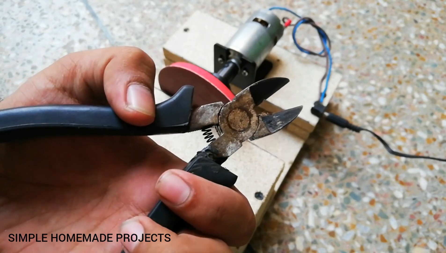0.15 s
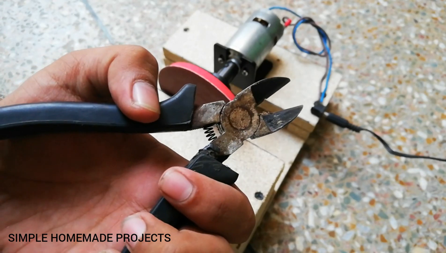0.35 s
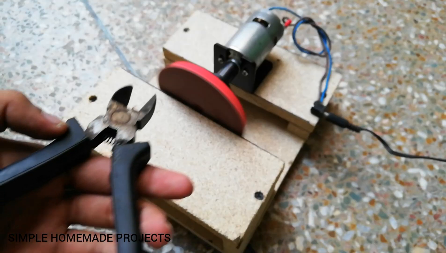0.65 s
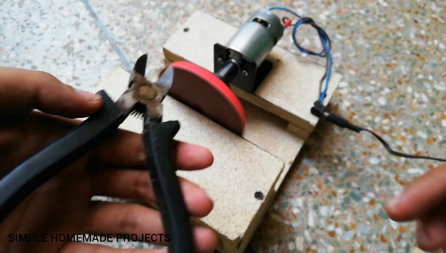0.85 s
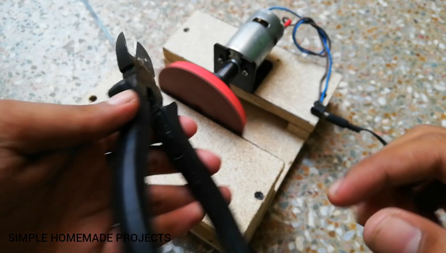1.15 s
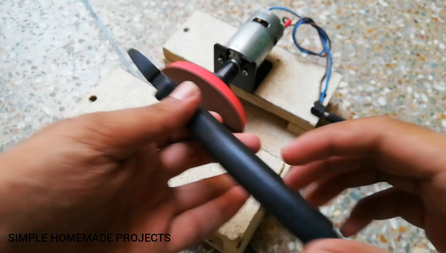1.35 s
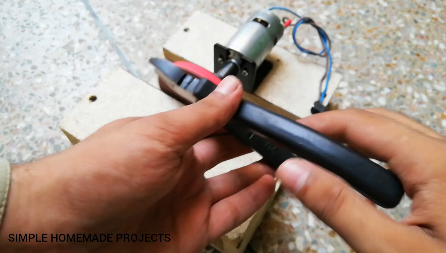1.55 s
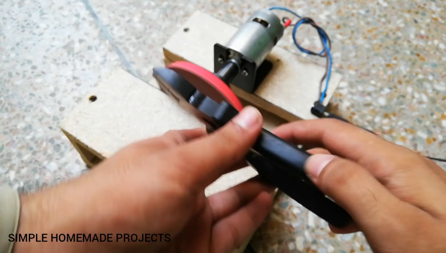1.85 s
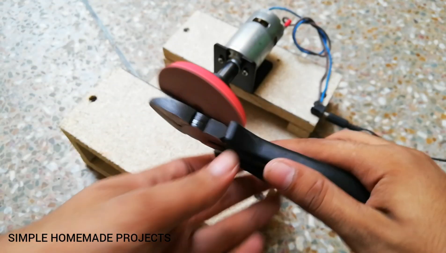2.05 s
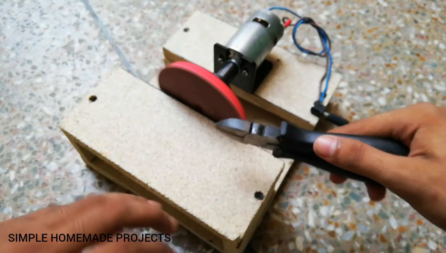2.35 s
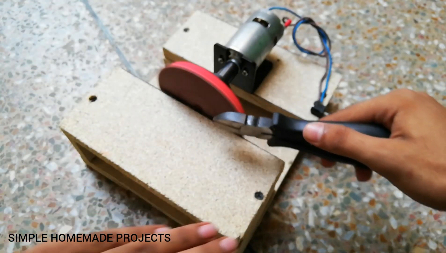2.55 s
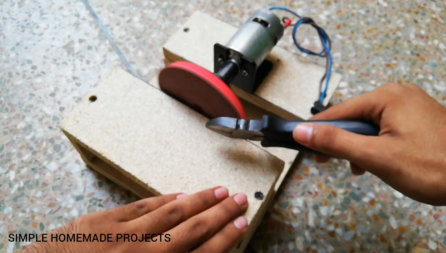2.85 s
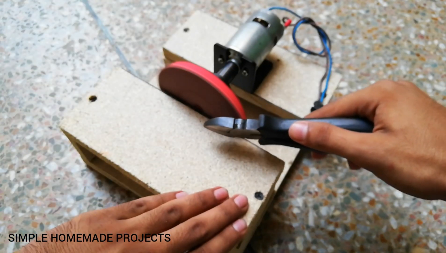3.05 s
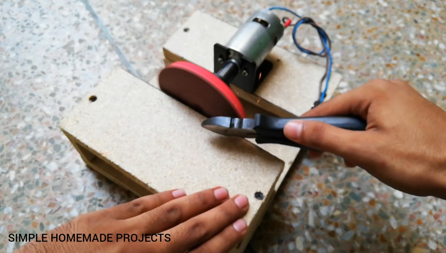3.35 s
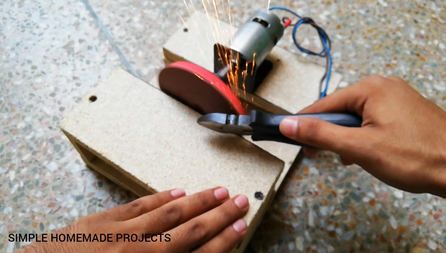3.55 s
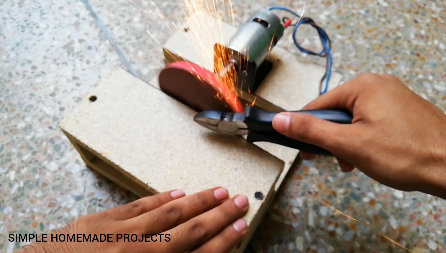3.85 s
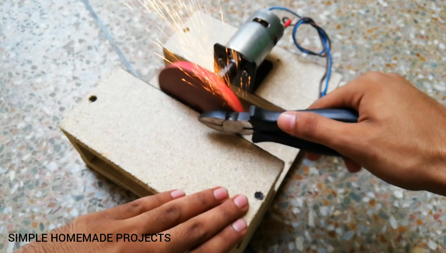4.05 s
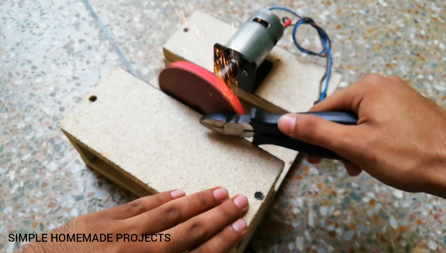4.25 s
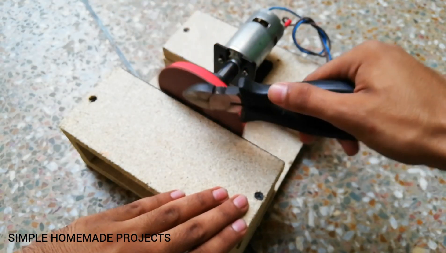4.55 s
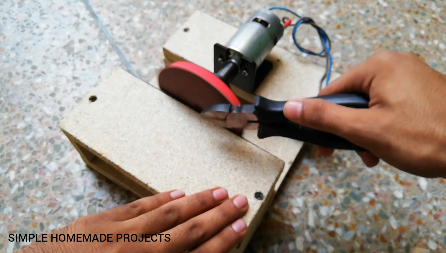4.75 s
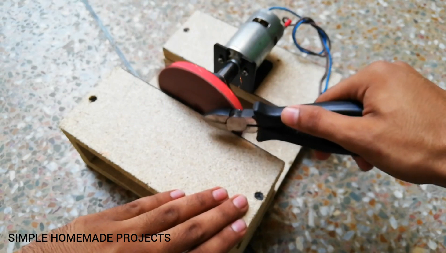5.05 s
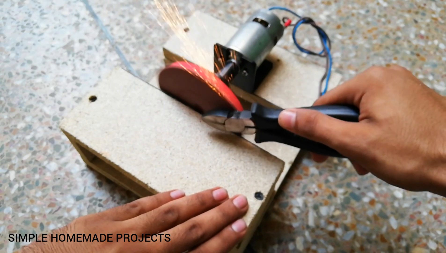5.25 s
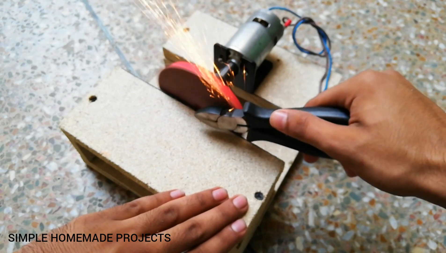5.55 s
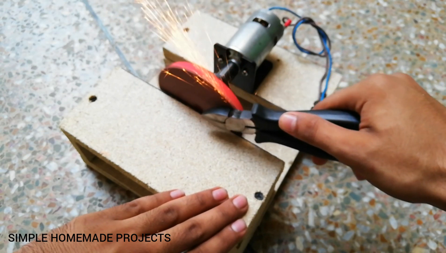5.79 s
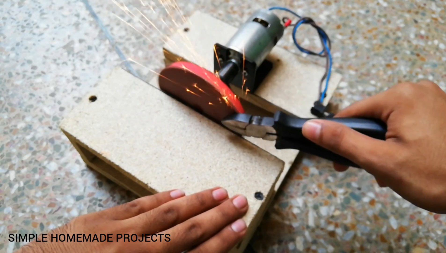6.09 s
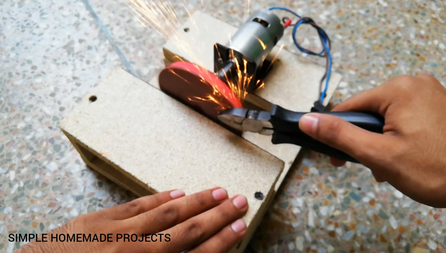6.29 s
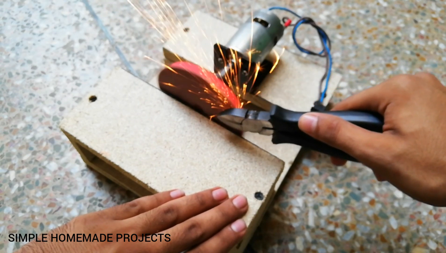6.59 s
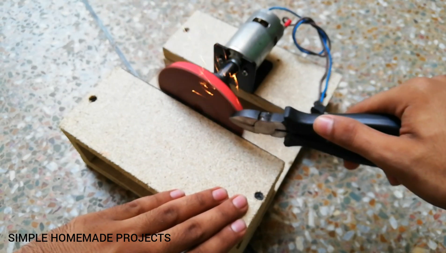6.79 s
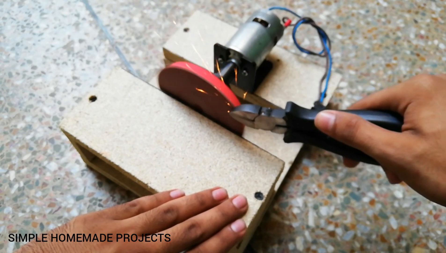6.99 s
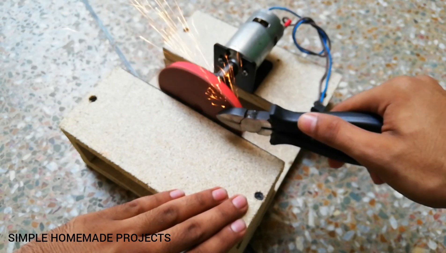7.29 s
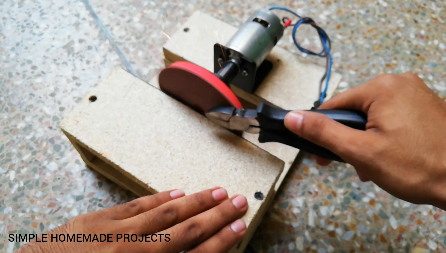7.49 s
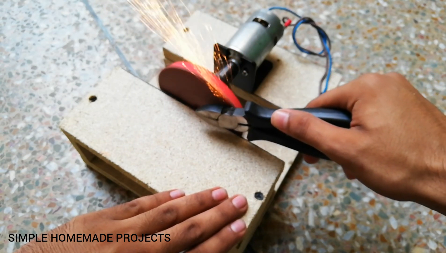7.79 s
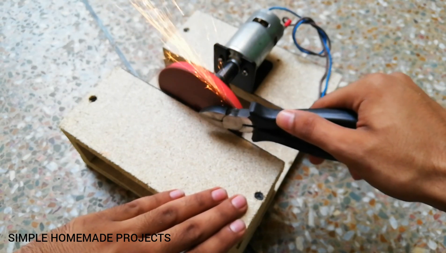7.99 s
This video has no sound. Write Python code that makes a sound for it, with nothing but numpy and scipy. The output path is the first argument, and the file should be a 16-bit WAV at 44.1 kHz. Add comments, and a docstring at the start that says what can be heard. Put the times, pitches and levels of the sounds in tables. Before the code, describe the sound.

Close up, a buzzing little disc sander runs free, then steel jaws press on, hissing and squealing shrilly while the motor pitch drops and knocks.

```python
"""A small DC motor spins a sanding disc on a wooden base on a stone floor, close to the microphones.
Shaft overtones drive the base's resonances; it rocks until a hand steadies it, while brushes hiss.
Steel pliers meet the disc: repeating grit scrapes them each turn, they ring near 10 kHz, the motor sags.
Twice the edge snags and drags the speed down, with decaying knocks. A room tail and faint rumble surround it."""
import sys
import numpy as np
from scipy import signal
from scipy.fft import rfft, irfft
from scipy.io import wavfile
from scipy.ndimage import uniform_filter1d, map_coordinates

SR = 44100
rng = np.random.default_rng(int(sys.argv[2]) if len(sys.argv) > 2 else 0)


def store_wav(level_fs):
    """Save 16-bit WAV to argv[1]."""
    pcm = np.round(np.clip(np.atleast_2d(level_fs), -1, 1) * 32767)
    wavfile.write(sys.argv[1], SR, pcm.T.astype(np.int16))


N = 358533
TIME = np.arange(N) / SR
FREQ = np.fft.rfftfreq(2 * N, 1 / SR) + 1e-3  # Hz, kept off zero
FREE_HZ = 160  # turns per second at which the free motor's levels are set


def undb(db):
    """Decibels to gain."""
    return 10 ** (np.asarray(db) / 20)


def curves(table):
    """Each column of a table, joined by straight lines in time."""
    seconds, *columns = np.transpose(table)
    return [np.interp(TIME, seconds, column) for column in columns]


def filtered(x, response):
    """Sound through a frequency response."""
    return irfft(rfft(x, 2 * N) * response)[..., :N]


def colour(points):
    """Response through (Hz, dB) points, joined on a logarithmic pitch axis."""
    hz, db = np.transpose(points)
    return undb(np.interp(np.log(FREQ), np.log(hz), db))


def band(lo_hz, hi_hz):
    """Steep band-pass response."""
    return 1 / np.sqrt((1 + (lo_hz / FREQ) ** 20) * (1 + (FREQ / hi_hz) ** 20))


def strength(x, response, size=3000):
    """Running rms of one band of a sound, shared by its channels."""
    power = np.atleast_2d(filtered(x, response) ** 2).mean(axis=0)
    return np.sqrt(np.abs(uniform_filter1d(power, size)) + 1e-18)


def walk(rate):
    """Smooth chance with a spread near 1, from random steps drawn at this rate in Hz."""
    k = max(int(SR / rate), 2)
    steps = np.repeat(rng.standard_normal(N // k + 1), k)[:N]
    return 1.3 * uniform_filter1d(uniform_filter1d(steps, k), k)


def place(x, left_db, lag_ms):
    """Left microphone louder by left_db (right if negative), right one later by lag_ms."""
    late = filtered(x, np.exp(-2j * np.pi * FREQ * lag_ms / 1000))
    return np.array([x * undb(left_db / 2), late * undb(-left_db / 2)])


def stroke(start_s, end_s, rise_s, fall_s):
    """Attack, hold and release, 0-1."""
    rise = np.clip((TIME - start_s) / rise_s, 0, 1)
    return rise * np.clip(1 - (TIME - end_s) / fall_s, 0, 1)


def swell(middle_s, length_s):
    """A bell, 0-1, with its length taken at half height."""
    return .5 ** (np.abs(2 * (TIME - middle_s) / length_s) ** 3)


# The unheld base rocks on the floor. Each row: time in seconds, depth 0-1, rate in Hz.
ROCKING = [(.42, 0, 35), (.74, .9, 38), (1.35, .92, 39), (1.75, .75, 40), (2.35, .45, 39), (2.52, 0, 38)]


def rocking():
    """Depth and rate of the rocking base over time."""
    return curves(ROCKING)


# The jaws lean on the disc and steady it. Each row: time in seconds, shaking taken away in dB.
STEADYING = [(3.22, -2.5), (3.34, 0.5), (3.45, -2.5), (5.25, -1), (5.75, 5), (6.5, 8), (6.86, 13.5),
             (7.07, 2), (7.9, 2)]


def steadying():
    """How firmly the jaws quiet the shaking, in dB; negative values let it grow."""
    return curves(STEADYING)[0]


# The pliers are pressed to the disc.
# Each row: start in seconds, end in seconds, basic high ring in dB, basic broad rasp in dB.
PRESSES = [(2.892, 3.62, -27.5, -33), (3.721, 3.98, -22.5, -33), (4.391, 4.426, -25, -35),
           (4.542, 5.943, -24.5, -33), (6.008, 6.88, -26, -34.5), (6.984, 8.009, -26.5, -33.5)]
BRUSH_TOP_DB, BRUSH_MIDDLE_DB = -29, -33  # basic levels of the free motor's hiss


def pressing():
    """Contact of the pliers 0-1, and the ring and rasp levels that replace the free motor's hiss."""
    contact, ring_db, rasp_db = 0, BRUSH_TOP_DB, BRUSH_MIDDLE_DB
    for start_s, end_s, top_db, middle_db in PRESSES:
        press = stroke(start_s, end_s, rise_s=.043, fall_s=.15)
        contact = contact + press
        ring_db = ring_db + press * (top_db - BRUSH_TOP_DB)
        rasp_db = rasp_db + press * (middle_db - BRUSH_MIDDLE_DB)
    return np.clip(contact, 0, 1), ring_db, rasp_db


# The edge snags and the mount clatters. Each row: start, end and rise time, all in seconds.
SNAGS = [(3.871, 3.955, 0.017), (7.939, 8.031, 0.15)]
LULL_AFTER_S, LULL_S, LULL_DB = .11, .11, -8  # a short quiet follows each snag


def snagging():
    """Grip of the snags 0-1, and the lull after them in dB."""
    grip = sum(stroke(start_s, end_s, rise_s, fall_s=.1) for start_s, end_s, rise_s in SNAGS)
    lull = sum(swell(end_s + LULL_AFTER_S, LULL_S) for _, end_s, _ in SNAGS)
    return grip, LULL_DB * lull


# Tone of the workshop's background. Each row: frequency in Hz, relative level in dB.
WORKSHOP = [(20, 9), (100, 17.5), (250, 16), (2000, -30)]
WORKSHOP_DB = -58  # before the slow swells


def workshop(load):
    """Faint low rumble, nearly alike at both microphones; grows with load, less if the jaws steady the disc."""
    air = rng.standard_normal(N) + 0.34 * rng.standard_normal((2, N))
    air = filtered(air, colour(WORKSHOP))
    swell_db = 2.5 * walk(6) + 10 * load + pressing()[0] - 0.66 * steadying()
    return air / air.std() * undb(WORKSHOP_DB + swell_db)


ROOM_T60_S, ROOM_DB = .28, -10.5  # tail level before its treble and bass are thinned


def room(x, boom_hz, damp_hz):
    """A short diffuse tail from floor and walls, different at each microphone, thin in the bass."""
    tail = rng.standard_normal((2, N)) * undb(-60 * TIME / ROOM_T60_S) * (TIME > .004)
    tail /= np.sqrt(np.sum(tail ** 2, axis=1, keepdims=True))
    walls = rfft(tail, 2 * N) / (1 + 1j * FREQ / damp_hz) / (1 + boom_hz / (1j * FREQ))
    return x + undb(ROOM_DB) * filtered(x.mean(axis=0), walls)


# The snagged edge kicks the disc. Each row: time in seconds, ring in Hz, peak in dB before placing.
KNOCKS = [(3.915, 1060, -14), (3.942, 1110, -15.5), (3.971, 1090, -23), (4.01, 1085, -27),
          (7.987, 1100, -18), (8.011, 1080, -17), (8.043, 1075, -23)]


def knocks():
    """A snagged edge kicks the disc in separate blows; each swells and rings away."""
    out = 0
    for start_s, hz, db in KNOCKS:
        age = np.maximum(TIME - start_s, 0) / .011  # in rise times
        ring = np.sin(2 * np.pi * (hz * TIME + rng.random()) + .5 * walk(300))
        out = out + undb(db) * (age * np.exp(1 - age)) ** 2 * ring
    return place(out, left_db=5, lag_ms=.08)


def grit(turns, renew_hz, repeat, size=400):
    """The same grains pass every turn, never at quite the same moment; the track changes slowly with wear."""
    tracks = rng.standard_normal((200, size))
    angle = (turns + .0013 * walk(110)) % 1
    worn = map_coordinates(tracks, [TIME * renew_hz, angle * size], order=3, mode="grid-wrap")
    return np.sqrt(repeat) * worn + np.sqrt(1 - repeat) * rng.standard_normal(N)


def high_spot(turns, width, rest_db):
    """Pressure over one turn: a rounded peak with long flanks over a light steady rub."""
    return 1 / (1 + (np.sin(np.pi * turns) / (np.pi * width)) ** 2) + undb(rest_db)


# Brushes and jaws sing for a while.
# Each row: middle in seconds, length in seconds, pitch in Hz, width in Hz, basic level in dB.
BRUSH_SONGS = [(.52, .56, 7000, 650, -37), (3.93, .06, 4200, 2500, -28), (4.3, .32, 3800, 1500, -37),
               (6.72, .13, 2600, 300, -41)]


def brush_songs(turns):
    """Passing resonances of brushes and jaws, excited by much the same roughness on every turn."""
    scratch = grit(turns, renew_hz=4, repeat=.7) * high_spot(turns, width=.1, rest_db=-5)
    out = 0
    for middle_s, length_s, hz, width_hz, db in BRUSH_SONGS:
        song = filtered(scratch, 1 / (1 + (2 * (FREQ - hz) / width_hz) ** 2))
        out = out + song / song.std() * undb(db) * swell(middle_s, length_s)
    return place(out * undb(-0.2), left_db=1.0, lag_ms=0.017)


BOUNCE_CYCLES, BOUNCE_SHARE = 10, .3  # delay in squeal cycles, gain of the second landing


def bounce(x, edge_hz):
    """The edge lands twice, about a millisecond apart: a comb of resonances that glides with the squeal."""
    earlier = TIME - BOUNCE_CYCLES / edge_hz
    return x + BOUNCE_SHARE * np.array([map_coordinates(side, [earlier * SR]) for side in x])


def squeal(turns, edge_hz, wander_hz, neighbours):
    """The cutting edge sings one even chirp at each pass of the high spot; its bouncing adds side tones."""
    angle = 2 * np.pi * np.cumsum(edge_hz + wander_hz * walk(500)) / SR
    tone = np.cos(angle) * (1 + neighbours * np.cos(angle / BOUNCE_CYCLES))
    tone = tone * high_spot(turns, width=.2, rest_db=-20) ** 2
    return place(tone / tone.std(), left_db=0, lag_ms=.022)


# Hiss of brushes and bearings. Each row: frequency in Hz, relative level in dB.
BRUSH = [(500, -16), (2000, -0.5), (3200, -8.5), (4250, -4), (5500, -10.5), (7000, -2.5), (7900, -2.5),
         (8550, 15.5), (9900, 14.5), (11200, 3.5), (12200, -9.5), (15500, -34)]


def brush_hiss(turns):
    """Brushes and bearings hiss, a little stronger once a turn."""
    grains = np.array([grit(turns, renew_hz=2.825, repeat=0.16) for _ in range(2)])
    return filtered(grains * high_spot(turns, width=0.025, rest_db=-6.5), colour(BRUSH))


# Steel under the grit. Each row: frequency in Hz, relative level in dB.
STEEL = [(120, -26), (400, -17), (1500, -11.5), (2620, -10), (5000, -10), (6800, -11), (8500, 8.5),
         (9900, 11), (11000, 9.5), (12200, -3), (15500, -21)]


def steel_scrape(turns, edge_hz, renew_hz, repeat, width, rest_db):
    """The high spot drags grit over the bouncing steel edge, which colours it."""
    grains = np.array([grit(turns, renew_hz, repeat) for _ in range(2)])
    return filtered(bounce(grains * high_spot(turns, width, rest_db), edge_hz), colour(STEEL))


# The cutting edge squeals as its angle changes.
# Each row: time in seconds, pitch in Hz before its wander, level in dB relative to the ring.
SQUEAL = [(3.1, 10050, -7), (3.5, 9500, -2), (4.5, 10150, -13), (5.1, 10250, -4), (5.4, 10250, -7),
          (5.7, 10300, 4), (5.88, 9800, 8), (6.38, 9450, -9), (6.8, 9850, 4), (7.1, 10600, -10),
          (7.7, 10400, -1), (8.13, 10200, -9)]
# The edge bites and the steel rings louder. Each row: middle in seconds, length in seconds, boost in dB.
BITES = [(3.5, 0.26, 5.5), (5.09, 0.026, 6), (5.475, 0.13, 3), (5.822, 0.13, 2), (6.078, .1, 1.5)]


def rubbing(turns, octaves):
    """Brush hiss while the disc runs free, a ringing scrape each turn once steel touches it."""
    contact, ring_db, rasp_db = pressing()
    edge_hz, squeal_db = curves(SQUEAL)
    edge_hz = edge_hz + 90 * walk(10)
    ring_db = ring_db + (1 - contact) * 14 * octaves  # free hiss fades as the disc slows
    ring_db = ring_db + sum(db * swell(middle_s, length_s) for middle_s, length_s, db in BITES)
    # a squealing edge rings more and rasps less
    ring_db = ring_db + 0.21 * contact * squeal_db
    rasp_db = rasp_db - 0.37 * contact * squeal_db

    brush = brush_hiss(turns)
    ring = steel_scrape(turns, edge_hz, renew_hz=5.4, repeat=.78, width=.14, rest_db=-22)
    song = squeal(turns, edge_hz, wander_hz=100, neighbours=.8)
    ring = ring / ring.std() + undb(squeal_db) * song
    # the slower the disc, the more the rasp breaks into one scrape a turn
    rasp = steel_scrape(turns, edge_hz, renew_hz=14, repeat=.5, width=.15, rest_db=6 * octaves)

    # level each part, then crossfade from brushes to steel
    top, middle = band(8000, 12000), band(2800, 7000)
    touch, free = np.sqrt(contact), np.sqrt(1 - contact)
    ring = touch * ring / strength(ring, top) + free * brush / strength(brush, top)
    rasp = touch * rasp / strength(rasp, middle) + free * brush / strength(brush, middle)
    # the hand never presses quite evenly
    tremor_db = (.4 + 1.4 * contact) * walk(26)
    # the jaws beam their ring towards the left microphone
    split = band(7440, 12400) ** 2
    beam_db = (3.96 + 3.8 * contact) * np.array([[1], [-1]]) / 2
    ring = filtered(ring, split) * undb(ring_db + 2.48 + beam_db)
    rasp = filtered(rasp, 1 - split) * undb(rasp_db + np.array([[3.8], [2.2]]))
    return (ring + rasp) * undb(tremor_db - 2 * rocking()[0] + snagging()[1])


# The board radiates the hum of the unbalanced disc. Each row: frequency in Hz, response in dB.
HUM = [(90, -43), (110, -40.5), (152, -40), (166, -42.5), (215, -55.5), (262, -50.5), (282, -43.5),
       (298, -53.5), (333, -43.5), (430, -45), (540, -49.5), (615, -37), (680, -39)]


def unbalance(turns, hum_db, steady_db):
    """Clean hum at one, two and four times the speed; steadying takes most from the lowest."""
    angle = 2 * np.pi * turns
    wobble = np.sin(angle) * undb(-1.8 * steady_db)
    wobble = wobble + np.sin(2 * angle) * undb(-.8 * steady_db)
    wobble = wobble + np.sin(4 * angle) * undb(-.7 * steady_db)
    return np.sqrt(2) * filtered(wobble, colour(HUM)) * undb(hum_db)


# The buzz and bracket swell or sink for a moment as the pliers shift on the disc.
# Each row: middle in seconds, length in seconds, change of buzz in dB, change of bracket in dB.
SHIFTS = [(3.175, .12, 6.5, 0), (3.512, .09, 3, 3), (3.65, .094, 8, 2), (3.85, .14, 6, 3),
          (4.492, .11, 8, 1), (4.66, .34, -3.5, 6), (4.986, .3, 3, -1.5), (6.1, .15, 7, 2),
          (6.46, .1, 4, 1), (7.33, .42, 9.5, 12), (7.61, .11, -8, -3)]


def shaking(octaves, depth):
    """Levels in dB: buzz and bracket follow speed, shifts and steadying; clatter is relative to the buzz."""
    contact, (snag, lull_db), steady_db = pressing()[0], snagging(), steadying()
    buzz_shift_db, bracket_shift_db = sum(np.outer(dbs, swell(s, length_s)) for s, length_s, *dbs in SHIFTS)
    buzz_db = -22 + 15 * octaves - 2 * contact + buzz_shift_db
    buzz_db = buzz_db - 4 * snag + .5 * lull_db - steady_db
    bracket_db = -27.5 + 25 * octaves - 0.5 * contact + bracket_shift_db
    bracket_db = bracket_db - 1.01 * steady_db + 0.2 * lull_db
    clatter_db = -18.5 - 6 * octaves + 12 * snag + 5 * depth + 0.12 * steady_db
    hum_db = -18 * snag + 2 * lull_db
    return buzz_db, bracket_db, clatter_db, hum_db, steady_db


# Force of the shaft on the mount.
# Each row: multiple of the speed, push in dB running free, push in dB with the pliers pressed on.
FORCE = [(3.05, 13, 20), (4, 5.5, 5.5), (5, 14, 16.5), (6.04, 8, 5), (7, 7, 9), (7.82, 8.5, 7.5),
         (9, 6.5, 3), (10.1, 1.5, 4.5), (12.4, 6, 2.5), (13.5, 1, 2), (40, -15, 8)]
# Full rocking splits side tones off each overtone.
# Each row: multiple of the speed, tone below in dB, tone above in dB, both relative to the overtone.
SIDE_TONES = [(5, -24, -13), (6, -17, -9), (7, -1, -19), (8, -8, -17), (12, -8, -16)]
# One overtone swells or sinks for a while.
# Each row: middle in seconds, length in seconds, multiple of the speed, change in dB.
OVERTONE_SWELLS = [(.8, 1.2, 5, 4), (1.7, 1.2, 6, -3.5), (3.0, .2, 3, 9), (3.3, .3, 12, -12),
                   (3.78, .2, 6, 9), (4.95, .6, 9, -14), (7.3, .7, 8, -7)]


def shaft_force(angle, octaves, contact, depth, rock_hz):
    """Overtones 3 to 32 of the shaft, each with side tones from the rocking and its own waver."""
    rock = np.exp(2j * np.pi * np.cumsum(rock_hz + .5 * walk(9)) / SR)
    multiples, free_db, pressed_db = np.transpose(FORCE)
    sides, below_db, above_db = np.transpose(SIDE_TONES)
    shaft, force = np.exp(1j * angle), 0
    overtone = shaft * shaft
    for k in range(3, 33):
        overtone = overtone * shaft
        below = undb(np.interp(k, sides, below_db)) * rock.conj()
        above = undb(np.interp(k, sides, above_db)) * rock
        sway = 1 + depth * (below + above)
        push_db = (1 - contact) * np.interp(k, multiples, free_db)
        push_db = push_db + contact * np.interp(k, multiples, pressed_db)
        for middle_s, length_s, multiple, db in OVERTONE_SWELLS:
            if multiple == k:
                push_db = push_db + db * swell(middle_s, length_s)
        push_db = push_db + (.7 + 2 * np.abs(octaves)) * walk(11)
        # the push is scattered over part of the turn
        scatter = np.exp(1.25j * rng.standard_normal())
        force = force + undb(push_db) * np.real(sway * overtone * scatter)
    return force


# Resonances of base and bracket. Each row: frequency in Hz, width in Hz, relative level in dB.
BASE_MODES = [(434, 105, -29), (840.7, 84.6, -6.5), (1004, 117.6, 1.5), (1125.6, 73.4, 6), (1322, 87, -4.5),
              (1680, 169, -3.5), (2041, 178, -10), (2573, 190, -17), (3720, 2300, -25)]


def base(turns, octaves):
    """The shaft drives the wooden base: overtones, rocking side tones and loose clatter share its resonances."""
    (depth, rock_hz), contact = rocking(), pressing()[0]
    buzz_db, bracket_db, clatter_db, hum_db, steady_db = shaking(octaves, depth)
    angle = 2 * np.pi * turns + .005 * walk(60)
    body = 0
    for i, (hz, width_hz, db) in enumerate(BASE_MODES):
        detune = (FREQ / hz - hz / FREQ) * hz / width_hz
        body = body + (-1) ** i * undb(db) / (1 + 1j * detune)
    low, high = band(700, 1400), band(1450, 2300)
    tone = filtered(shaft_force(angle, octaves, contact, depth, rock_hz), body)
    clatter = filtered(rng.standard_normal(N) * (1 + 0.14 * np.cos(angle)), body)
    buzz = tone / strength(tone, low) + undb(clatter_db) * clatter / strength(clatter, low)
    # pressed steel damps the base outside a narrow core
    narrowing = .61 * contact
    buzz = (1 - narrowing) * buzz + narrowing * filtered(buzz, band(1005, 1140))
    # the bracket's upper resonances have their own level; both waver more away from FREE_HZ
    split = 1 / (1 + (1420 / FREQ) ** 20)
    waver_db = .3 + 2 * np.abs(octaves)
    # the buzz breaks into bumps when the jaws lean hard
    bump_db = 2.2 * np.clip(steady_db / 4, 0, 1)
    lower = filtered(buzz, 1 - split) / strength(buzz, low)
    lower = lower * undb(buzz_db + (waver_db + bump_db) * walk(32))
    upper = filtered(buzz, split) / strength(buzz, high)
    upper = upper * undb(bracket_db + .7 * waver_db * walk(14))
    hum = unbalance(turns, hum_db, steady_db)
    return (place(lower, left_db=6.5, lag_ms=0.068) + place(upper, left_db=-3.0, lag_ms=0.059)
            + place(hum, left_db=0.2, lag_ms=0.67))


# Speed of the shaft. Each row: time in seconds, turns per second in Hz.
SPEED = [(0.0, 148.6), (.59, 156.5), (1.19, 161.9), (1.9, 165.8), (2.87, 168.2), (3.19, 158.4),
         (3.66, 141.9), (3.87, 139.6), (3.92, 133.3), (3.98, 108.4), (4.03, 107.3), (4.29, 124), (4.5, 133),
         (4.74, 135.4), (5.27, 123.8), (5.59, 119.5), (6.07, 110.3), (6.24, 104.4), (6.51, 99.95),
         (7.19, 112.7), (7.6, 107.3), (7.95, 108), (8.04, 88)]


def scene():
    """One shaft angle drives the base, the scrape and the brush songs."""
    (speed_hz,) = curves(SPEED)
    turns = np.cumsum(speed_hz) / SR
    load = 1 - speed_hz / speed_hz.max()
    octaves = np.log2(speed_hz / FREE_HZ)
    machine = base(turns, octaves) + rubbing(turns, octaves) + brush_songs(turns) + knocks()
    return room(machine, boom_hz=450, damp_hz=8260) + workshop(load)


def record(dry):
    """Round the tallest peaks and cut the treble steeply above 15.6 kHz."""
    rounded = dry / (1 + (dry / .8) ** 6) ** (1 / 6)
    return signal.sosfilt(signal.ellip(10, .2, 80, 15600, fs=SR, output="sos"), rounded)


dry = scene()
out = record(dry)
store_wav(out)
```